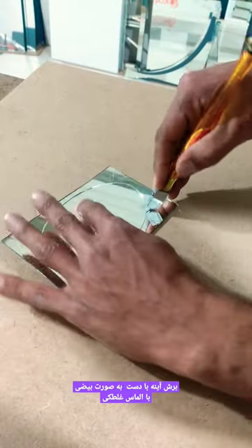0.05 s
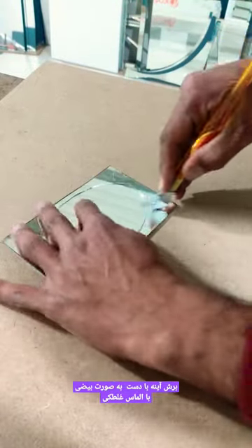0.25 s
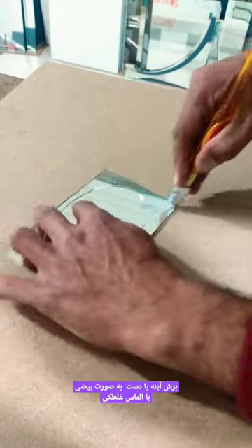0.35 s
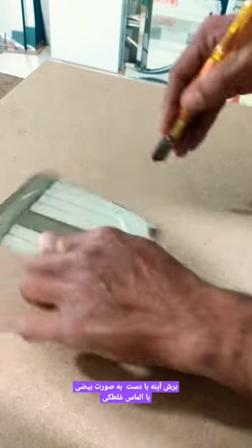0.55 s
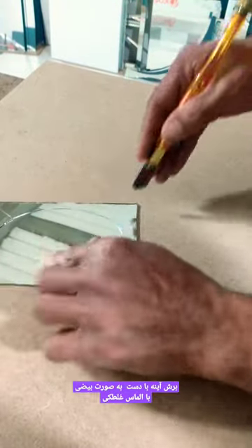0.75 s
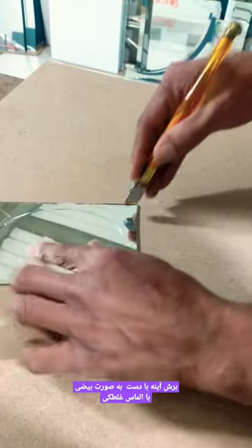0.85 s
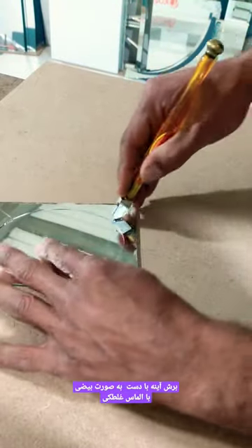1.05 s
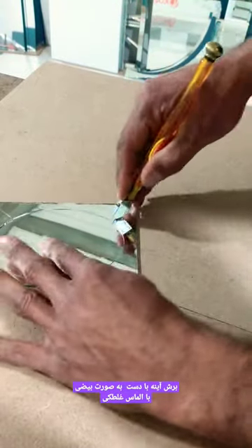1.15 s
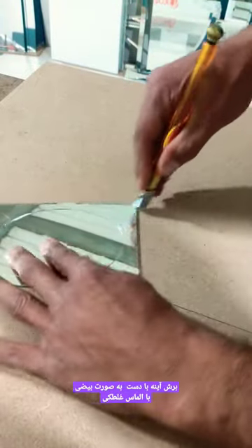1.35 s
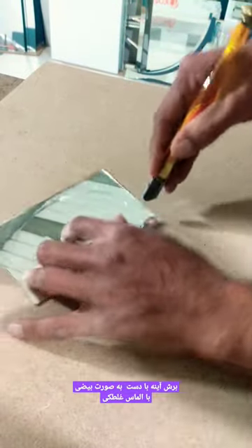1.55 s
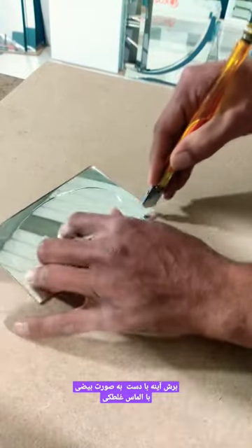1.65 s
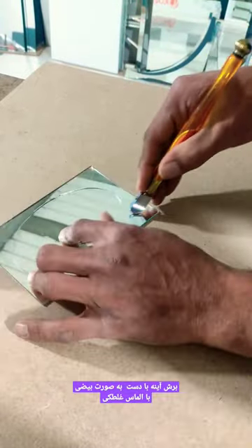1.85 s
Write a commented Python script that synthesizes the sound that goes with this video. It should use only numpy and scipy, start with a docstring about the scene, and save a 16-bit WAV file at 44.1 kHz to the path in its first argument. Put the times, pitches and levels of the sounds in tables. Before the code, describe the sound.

Glass clicks and scrapes grittily on wood as it is turned between roller cutter presses.

```python
"""A small mirror is turned by hand on a wooden board, between short presses of a roller glass cutter.
First the wheel squeals faintly and three contacts sound, each a bright tick in the glass and a hollow
knock of the pane on the board. The pane then slides, hissing over grit and rocking. Near one second
fingers brush it as they change grip; three more contacts and a short turn back follow, and it settles.
Throughout, the sound lies well to the left in a small room with a low steady noise."""
import sys
import numpy as np
from scipy import signal
from scipy.io import wavfile
from scipy.ndimage import uniform_filter1d

SR = 44100
rng = np.random.default_rng(int(sys.argv[2]) if len(sys.argv) > 2 else 0)


def persist_wave(psi):
    """Save psi, clipped to +-1, as 16-bit WAV."""
    counts = np.round(np.clip(psi, -1, 1) * 32767).astype(np.int16)
    wavfile.write(sys.argv[1], SR, np.atleast_2d(counts).T)


N = 83790
T = np.arange(N) / SR

# Contacts of cutter and pane. Each row: start in seconds, levels of tick, crack, knock and thump in dB,
# pitch factor of the knock, tilt of the tick in dB per octave.
IMPACTS = [(0.0734, -43.5, -41, -35.5, -45.5, 1.005, -4), (0.2054, -30, -37.5, -29, -34, 1.025, -0.5),
           (0.3156, -14.5, -26, -20, -32.5, 0.96, -2.5), (1.1363, -38, -32, -29.5, -30, 0.97, 7),
           (1.2560, -31.5, -36.5, -26.5, -34, .98, -2.5), (1.492, -28, -34, -25.5, -33, 0.98, -2)]
def contacts():
    """Impact excitation: each contact ticks and cracks in the glass and sets pane and board ringing."""
    out = np.zeros(N)
    for start, tick_db, crack_db, knock_db, thump_db, pitch, tilt in IMPACTS:
        add(out, start, amp(tick_db) * tick(tilt))
        add(out, start, amp(crack_db) * crack())
        add(out, start, amp(knock_db) * knock(pitch) + amp(thump_db) * thump())
    return signal.lfilter(*signal.butter(2, 119, "high", fs=SR), out)  # a small pane radiates little bass


# Spectrum of a tick. Each row: frequency in Hz, relative level in dB before the tilt.
TICK_SPECTRUM = [(300, -23), (1200, -21.5), (2800, -11.5), (3600, -23), (4800, -24), (5900, -9.5),
                 (6900, -17), (7700, -3), (8600, 2), (9500, -5), (10500, -13.5), (12500, -21.5),
                 (15500, -33)]
def tick(tilt):
    """Source and filter: the glass colours a crunch into a bright tick."""
    return colour(crunch(), [(hz, db + tilt * np.log2(hz)) for hz, db in TICK_SPECTRUM])


def crunch(rise_s=0.00087, hold_s=0.0022, fall_s=0.00067, rattle_db=-22.5, rattle_s=0.036):
    """A brief force has a broad spectrum: milliseconds of noise, then a faint rattle of grit."""
    t = T[:SR // 8]
    burst = np.minimum(t / rise_s, 1) * np.exp(-np.maximum(t - hold_s, 0) / fall_s)
    rattle = amp(rattle_db) * np.exp(-t / rattle_s)
    return (burst + rattle) * rng.choice([-1, 1], len(t))


# Spectrum of a crack. Each row: frequency in Hz, relative level in dB.
CRACK_SPECTRUM = [(200, -31), (800, -9), (1300, 6), (1900, 0.5), (2300, -13), (2900, 4.5), (3500, -8.5),
                  (4300, -24.5), (5200, -22.5), (9000, -42.5)]
def crack(delay_s=0.00095, rise_s=0.00081):
    """Impact transient: the pane's edge slaps just behind the tick."""
    age = np.maximum(T[:SR // 40] - delay_s, 0) / rise_s
    return colour(age * np.exp(1 - age) * rng.choice([-1, 1], len(age)), CRACK_SPECTRUM)


# Modes of the pane. Each row: nominal frequency in Hz, relative level in dB, T60 in seconds.
PANE_MODES = [(473, -10.5, 0.058), (639, -13.5, 0.073), (888, -6, 0.054), (958, 3.5, 0.036),
              (1106, -8.5, 0.036), (1361, -5, 0.03), (1577, -14, 0.026), (1990, -22, 0.012),
              (2726, -16.5, 0.024), (3070, -13.5, 0.016)]
def knock(pitch):
    """Free vibration: the pane rings hollowly on the board."""
    return ring(PANE_MODES, pitch)


# Modes of the board. Each row: nominal frequency in Hz, relative level in dB, T60 in seconds.
BOARD_MODES = [(163.3, -9, 0.2), (231.2, -2, 0.055), (313, -6, .04), (364, 1.5, 0.056), (424.4, -4, 0.055)]
def thump():
    """Free vibration: the board answers in its low modes."""
    return ring(BOARD_MODES, pitch=0.97)


def ring(modes, pitch, detune=0.035, rise_cycles=2.1, delay_at_1khz_s=0.002005):
    """Modal superposition: damped sines add up; the low ones arrive later and build more slowly."""
    t, out = T[:SR // 3], 0
    for (hz, db, t60), chance in zip(modes, rng.standard_normal(len(modes))):
        hz = hz * pitch * (1 + detune * chance)
        age = np.maximum(t - delay_at_1khz_s * np.sqrt(1000 / hz), 0)
        rise = np.minimum(age * hz / rise_cycles, 1)
        out = out + rise * amp(db - 60 * age / t60) * np.sin(2 * np.pi * hz * age)
    return out


# Three slides of the pane. Each row: time in seconds, relative levels of hiss and of rub in dB.
FIRST_TURN = [(0.335, -34.5, -56), (0.347, -62, -43), (0.355, -40, -59), (0.377, -40, -54.5),
              (0.469, -43, -63), (0.493, -67, -63), (0.501, -56, -51.5), (0.517, -55, -61),
              (0.577, -47, -49.5), (0.629, -46, -36.5), (0.657, -45, -48), (0.705, -47, -52.5),
              (0.725, -50.5, -55), (0.767, -48, -50.5), (0.841, -75, -70.5), (0.86, -90, -64)]
RETURN_TURN = [(1.347, -45.5, -61), (1.355, -39, -78), (1.417, -35, -54), (1.484, -50.5, -74)]
SETTLING = [(1.51, -56, -51.5), (1.528, -50, -48), (1.566, -52.5, -53.5), (1.594, -54, -52),
            (1.614, -56, -63), (1.716, -62, -67), (1.72, -60, -65.5), (1.814, -96, -75.5),
            (1.83, -86, -101)]
# The pane catches on grit as it starts to move. Each row: start in seconds, level in dB.
GRIT_CATCHES = [(1.3314, -39), (1.3382, -40.5), (1.3442, -38)]
# The pane rocks as it slides. Each row: start in seconds, level in dB.
ROCKING_KNOCKS = [(.498, -46), (.6085, -30), (0.6132, -48), (.6250, -32.5), (0.6383, -49), (.716, -39.5),
                  (1.587, -69)]
def slides(hiss_gain_db=3, rub_gain_db=5, start_s=0.008, stop_s=0.022):
    """Sliding friction: grit hisses in the glass and rubs the board; the pane catches and rocks."""
    hiss, rub, rocking = np.zeros((3, N))
    for slide in (FIRST_TURN, RETURN_TURN, SETTLING):
        times, hiss_db, rub_db = np.transpose(slide)
        outside = np.maximum((times[0] - T) / start_s, (T - times[-1]) / stop_s)
        moving = np.exp(-np.maximum(outside, 0) ** 2)
        hiss += moving * amp(np.interp(T, times, hiss_db) + hiss_gain_db)
        rub += moving * amp(np.interp(T, times, rub_db) + rub_gain_db)
    hiss, rub = hiss * grit(), rub * grit()
    for start, db in GRIT_CATCHES:
        add(hiss, start, amp(db) * crunch())
    for start, db in ROCKING_KNOCKS:
        add(rocking, start, amp(db) * knock(pitch=0.97))
    return glass_hiss(edge_echoes(hiss)) + hollow_rub(rub) + rocking


def grit(grains_per_s=7700, spread_db=2.5):
    """Shot noise: dense tiny impacts of uneven size fall at random times."""
    size = amp(spread_db * np.minimum(rng.exponential(1, N), 4))
    return unit(size * rng.choice([-1, 1], N) * (rng.random(N) < grains_per_s / SR))


# Waves returning from the pane's edges. Each row: delay in milliseconds, mean relative strength.
EDGE_REFLECTIONS = [(1.17, 0.5), (1.56, 0.25), (2.85, 0.53), (3.45, 0.73)]
def edge_echoes(x, drift=0.64, drift_s=0.16):
    """Comb filtering: echoes in the pane interfere, their strengths drifting at random as it turns."""
    out, power = x, 1
    for ms, strength in EDGE_REFLECTIONS:
        wander = np.interp(T / drift_s, np.arange(40), rng.standard_normal(40))
        gain = strength * (1 + drift * wander)
        out = out + gain * np.roll(x, round(ms * SR / 1000))
        power = power + gain ** 2
    return out / np.sqrt(power)


# Gaps between the pane's resonances. Each row: frequency in Hz, width in percent of that frequency.
ANTIRESONANCES = [(3400, 2.4), (5170, 5.1), (7020, 5.5)]
# Spectrum of glass on grit. Each row: frequency in Hz, relative level in dB.
HISS_SPECTRUM = [(200, -27.5), (1200, -18.5), (2200, -23.5), (2950, -9.5), (3450, -25.5), (4300, -22.5),
                 (5150, -28.5), (5550, -10), (6400, -21.5), (7020, -15.5), (7400, -8), (8300, -2.5),
                 (9100, -2.5), (10200, -20.5), (11700, -20.5), (13000, -38.5), (14300, -25), (15400, -34),
                 (16000, -58.5)]
def glass_hiss(friction):
    """Antiresonance: the pane colours the hiss and hardly radiates between its resonances."""
    for hz, percent in ANTIRESONANCES:
        friction = signal.lfilter(*signal.iirnotch(hz, 100 / percent, SR), friction)
    return colour(friction, HISS_SPECTRUM)


# Spectrum of the rub. Each row: frequency in Hz, relative level in dB.
RUB_SPECTRUM = [(60, -27), (160, -20), (290, -10), (480, -5.5), (680, -10), (860, 0), (1020, -1.5),
                (1200, -6), (1400, -6.5), (1900, -17), (2800, -16.5), (3400, -27), (7000, -51.5)]
def hollow_rub(friction, note_hz=911, q=6):
    """Resonance: the pane's main note stands out of the rub."""
    rub = colour(friction, RUB_SPECTRUM)
    note = signal.lfilter(*signal.iirpeak(note_hz, q, SR), rub)
    return 0.88 * (rub + 0.58 * note)


# Changes of grip. Each row: start in seconds, length in seconds, level in dB.
BRUSH_STROKES = [(0.91, 0.052, -55), (.969, 0.064, -48.5), (1.032, 0.095, -64)]
# Spectrum of fingers on glass. Each row: frequency in Hz, relative level in dB.
BRUSH_SPECTRUM = [(200, -40), (700, -7.5), (920, 3), (1100, -1), (1500, -3.5), (1900, -18.5), (2400, -22),
                  (2850, -15.5), (3400, -30.5), (6800, -31), (8400, -11), (10000, -27.5), (15000, -51)]
def finger_brushes(rise_s=0.011):
    """Skin friction: fingers brush the pane in strokes that rise quickly and fade."""
    envelope = np.zeros(N)
    for start, length, db in BRUSH_STROKES:
        t = T[T < length]
        add(envelope, start, amp(db) * np.minimum(t / rise_s, 1) * np.sqrt(1 - t / length))
    return colour(envelope * grit(), BRUSH_SPECTRUM)


# Drags of the hand. Each row: time of the peak in seconds, half length in seconds, level in dB.
DRAG_SWELLS = [(0.191, 0.045, -59), (0.735, 0.019, -53.5), (0.851, 0.07, -58.5), (1.244, 0.082, -52.5),
               (1.29, 0.062, -71), (1.54, 0.077, -52)]
# Spectrum of a hand on wood. Each row: frequency in Hz, relative level in dB.
DRAG_SPECTRUM = [(50, -13.5), (110, -7.5), (162, -3.5), (200, -1), (320, -6), (450, -13), (700, -13),
                 (920, -4.5), (1300, -24.5), (3000, -41), (8000, -51.5)]
def hand_drags():
    """Friction on wood: the hand drags on the board in dull swells."""
    envelope = sum(amp(db) * np.exp(-((T - peak) / half) ** 2) for peak, half, db in DRAG_SWELLS)
    return colour(envelope * grit(), DRAG_SPECTRUM)


# Envelope of the squeal. Each row: time in seconds, level in dB.
SQUEAL_LEVELS = [(0, -71.5), (.015, -61), (.045, -61), (.06, -79.5), (.09, -67.5), (.13, -74), (.16, -68),
                 (.2, -73), (.22, -92)]
def wheel_squeal(pitch_hz=7154, waver_hz=20):
    """Frequency modulation: the rolling cutter wheel gives a thin tone that wavers at random."""
    times, db = np.transpose(SQUEAL_LEVELS)
    waver = unit(uniform_filter1d(rng.standard_normal(N), size=400))
    phase = 2 * np.pi * np.cumsum(pitch_hz + waver_hz * waver) / SR
    return amp(np.interp(T, times, db)) * (T < times[-1]) * np.sin(phase)


# Decay of the room. Each row: frequency in Hz, T60 in seconds.
REVERB_TIMES = [(150, .45), (500, 0.59), (1000, 0.26), (3000, 0.38), (8500, 0.38), (15000, 0.29)]
def room(x, early_db=-9.5, early_s=0.0026, tail_db=-11):
    """Reverberation: quick reflections off the bench and a short tail reach one ear."""
    t = T[:SR // 2]
    early, tail = rng.standard_normal((2, len(t)))
    early *= np.exp(-t / early_s) * (t > 0.001)
    hz, age, spectrum = signal.stft(tail * np.minimum(t / 0.004, 1), SR, nperseg=256)
    decay = amp(-60 * age / read(REVERB_TIMES, hz)[:, None])
    tail = signal.istft(spectrum * decay, SR, nperseg=256)[1][:len(t)]
    reflections = amp(early_db) * early / np.linalg.norm(early) + amp(tail_db) * tail / np.linalg.norm(tail)
    return signal.fftconvolve(x, reflections)[:N]


# Path to the right ear. Each row: frequency in Hz, gain in dB.
RIGHT_SHADING = [(60, 7), (200, -6), (400, -2), (900, -18), (1300, -12), (2400, -10), (4400, -2),
                 (6000, -11.5), (8200, -28), (11000, -15.5), (15000, -4)]
def shaded_ear(x):
    """Acoustic shadow: the bench and its reflections reach the right ear weakened and coloured."""
    return signal.fftconvolve(0.5 * x + amp(-2.5) * room(x), response(RIGHT_SHADING))[:N]


# Spectrum of the room noise. Each row: frequency in Hz, relative level in dB.
NOISE_SPECTRUM = [(20, 4), (43, 5), (60, 3.5), (120, -9.5), (160, 1.5), (230, -8.5), (500, -15.5),
                  (900, -17.5), (1500, -34.5), (4000, -39.5), (8500, -36.5), (12000, -42), (14000, -61.5)]
def room_noise(level_db=-56.5, right_db=-10.5, correlation=0.91):
    """Partial coherence: a low steady noise is much alike in both ears, though weaker on the right."""
    left, independent = (colour(noise, NOISE_SPECTRUM) for noise in rng.standard_normal((2, N)))
    right = correlation * left + np.sqrt(1 - correlation ** 2) * independent
    return amp(level_db) * np.array([left, amp(right_db) * right])


def amp(db):
    """Amplitude ratio of a level in decibels."""
    return 10 ** (np.asarray(db) / 20)


def unit(x):
    """Normalisation to rms 1."""
    return x / np.sqrt(np.mean(x ** 2) + 1e-20)


def read(points, hz):
    """Interpolation on a log-frequency axis."""
    f, value = np.transpose(points)
    return np.interp(np.log(hz + 1), np.log(f + 1), value)


def add(mix, start_s, sound):
    """Superposition: a sound joins the mix at its start time."""
    part = mix[max(round(start_s * SR), 0):][:len(sound)]
    part += sound[:len(part)]


def response(points, size=4096):
    """Minimum phase: a causal impulse response with the given spectrum."""
    log_gain = np.log(amp(read(points, abs(np.fft.fftfreq(size, 1 / SR)))))
    return np.fft.ifft(np.exp(np.conj(signal.hilbert(log_gain)))).real[:size // 2]


def colour(x, points):
    """Convolution: shapes a spectrum, keeping the power of white noise."""
    h = response(points)
    return signal.fftconvolve(x, h / np.linalg.norm(h))[:N]


def scene():
    """Binaural hearing: the left ear faces the bench; friction, being spread out, differs in each ear."""
    cutter = contacts() + wheel_squeal()
    left, right = (cutter + slides() + finger_brushes() + hand_drags() for ear in range(2))
    right = shaded_ear(right)
    return np.array([left + room(left), right]) + room_noise()


def record(dry, cutoff_hz=15800):
    """Band limiting: a steep low-pass removes the highest treble."""
    low_pass = signal.firwin(511, cutoff_hz, window=("kaiser", 9), fs=SR)
    return signal.oaconvolve(dry, low_pass[None], "same")


dry = scene()
out = record(dry)
persist_wave(out)
```